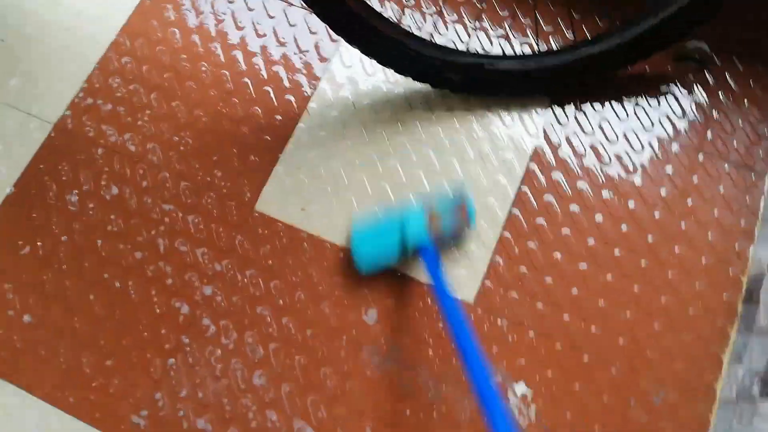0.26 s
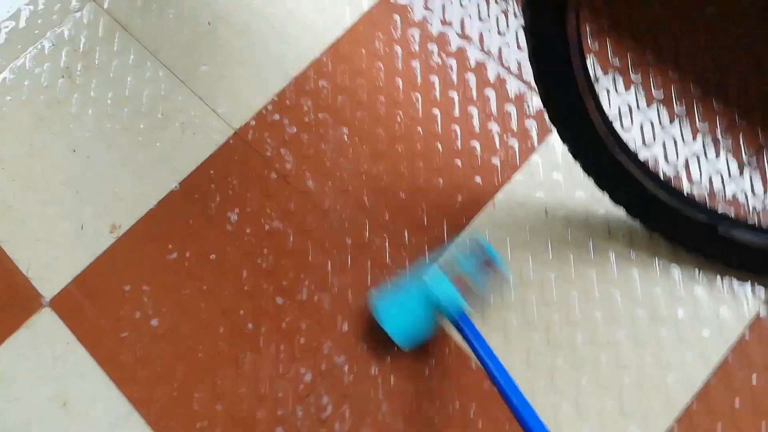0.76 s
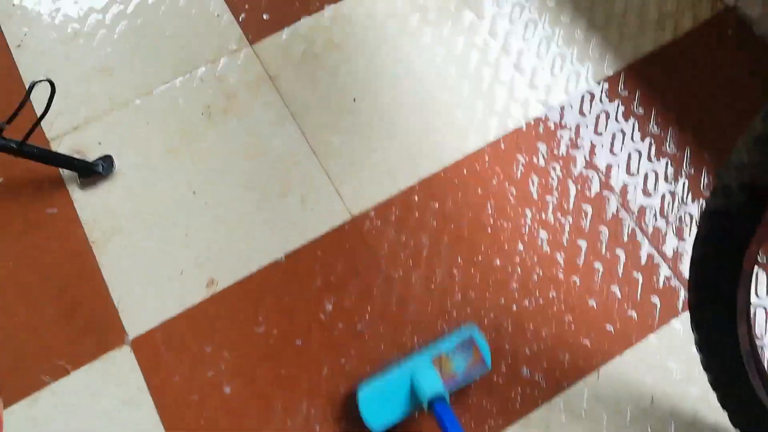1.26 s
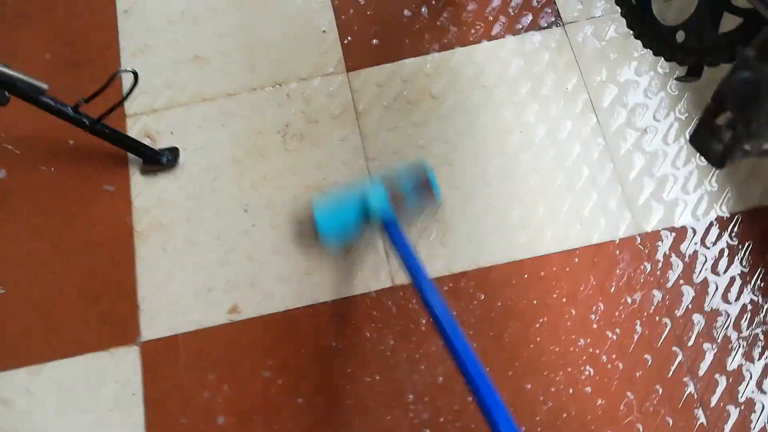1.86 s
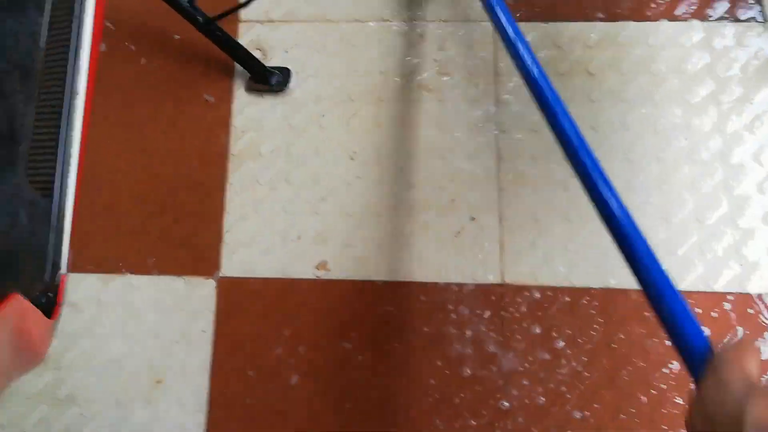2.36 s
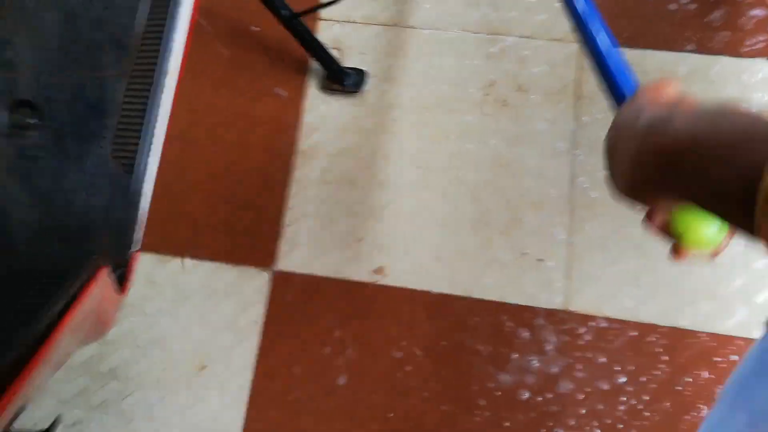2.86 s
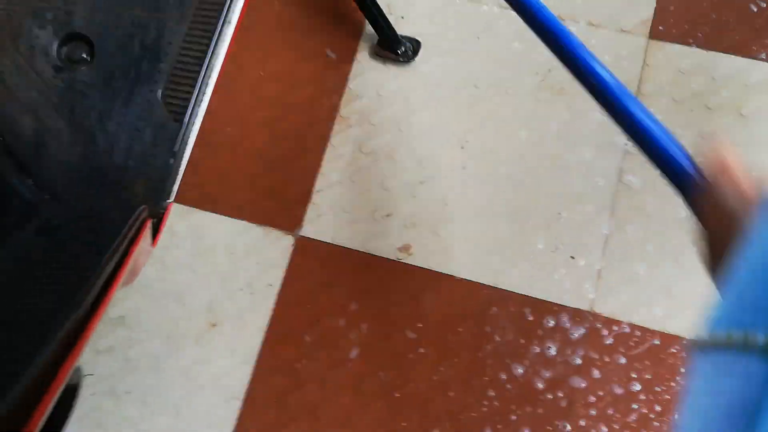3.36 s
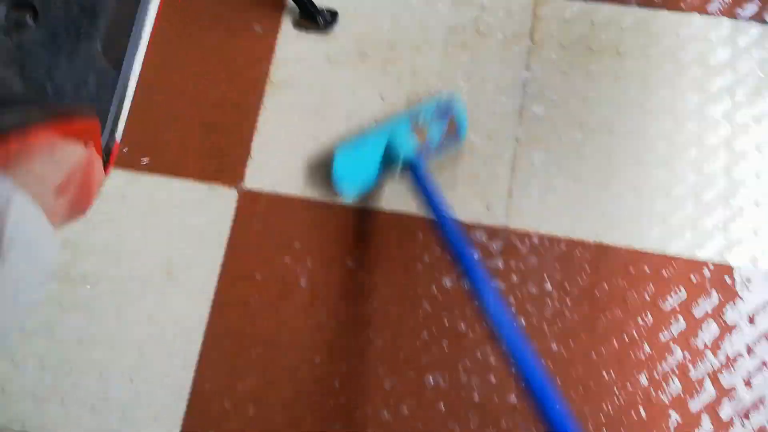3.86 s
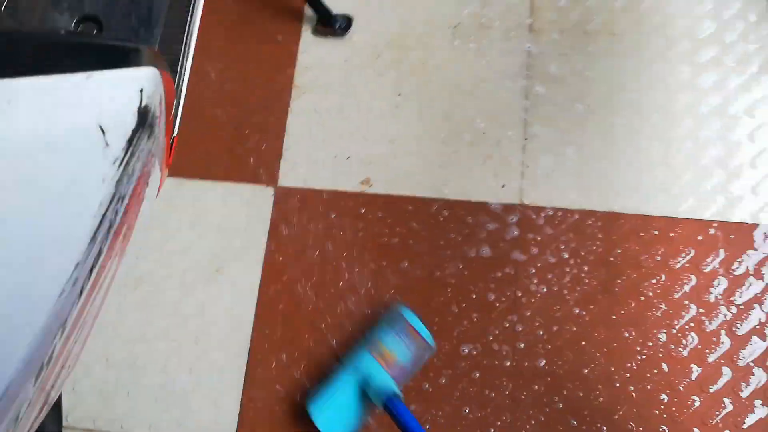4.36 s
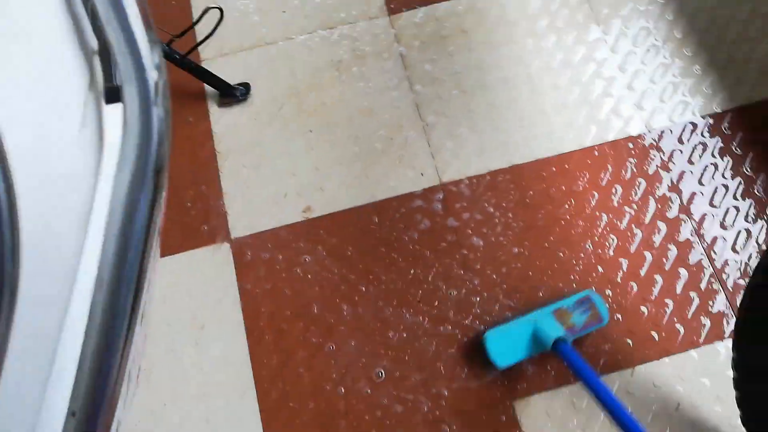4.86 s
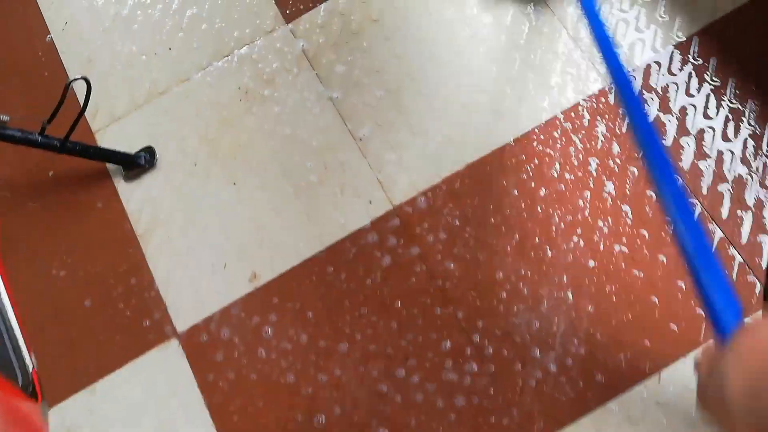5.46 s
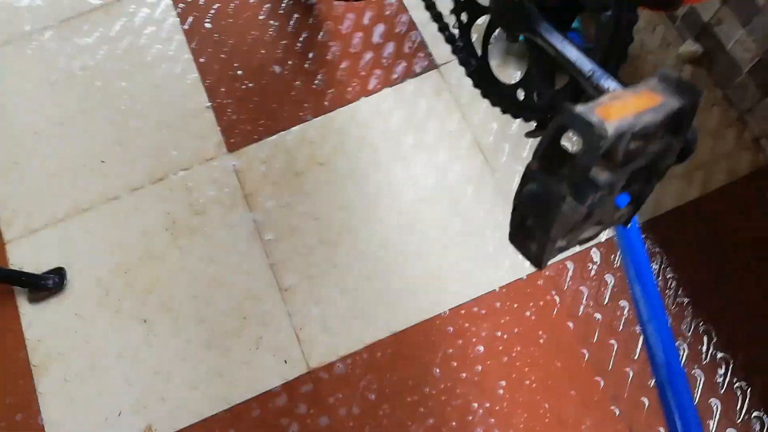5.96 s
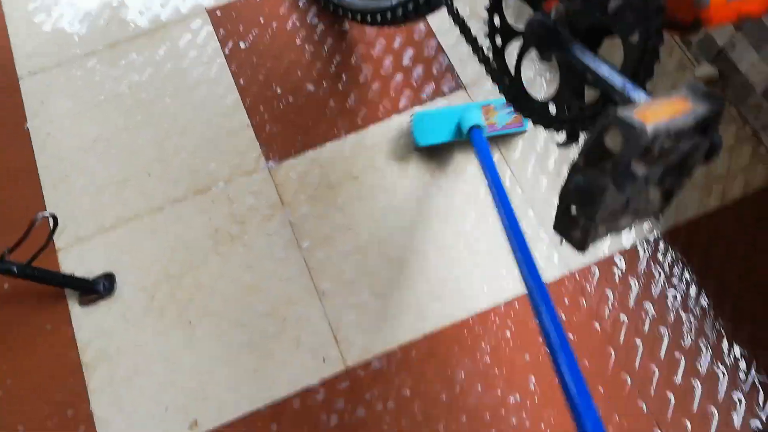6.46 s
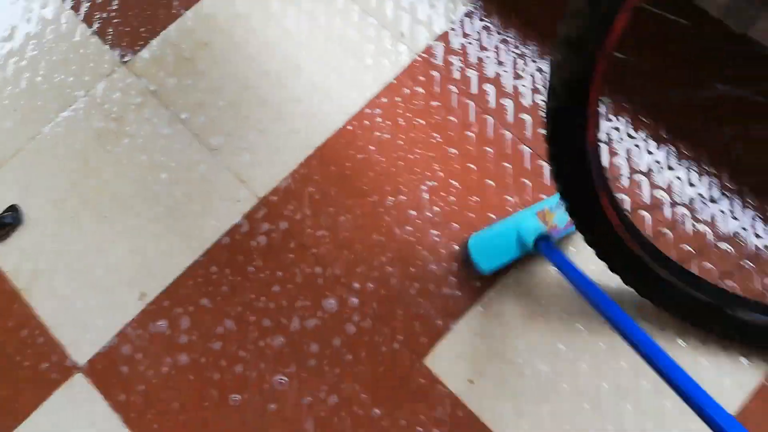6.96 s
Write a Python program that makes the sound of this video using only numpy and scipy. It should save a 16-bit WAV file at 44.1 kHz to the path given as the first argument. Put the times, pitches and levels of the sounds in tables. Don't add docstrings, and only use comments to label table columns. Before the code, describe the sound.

Outdoors in a hard-walled yard, a stiff brush scrubs wet studded tile close to a hand-held stereo microphone. From 0 s, quick alternating pulls and pushes come about four to five per second, nearly without gaps: bright fizz of bristle tips in suds, mid-high scrape, coarser rasp, and a stuttering hollow plastic knock as tufts catch studs. Harder knocks stand out near 0.1, 1.4, 2.3, 2.75 and 3.2 s. Beneath lie low rumble and a faint far motor, swelling near 0.1, 2.9 and 5.2 s. A tiny high bird whistle glides at 0.2-0.3 s. Soft air thumps hit the microphone around 1.3, 1.65, 2.15, 3.0, 3.3 and 5.05 s, with brief gusts at 3.0 and 3.3 s. Strokes ease slightly after 5.5 s. At 6.95 s the head bounces rapidly on a bicycle wheel, a short dry metallic clack, checking the stroke; a last lighter rasp fades after 7.1 s.

```python
import sys
import numpy as np
from scipy import signal
from scipy.fft import rfft, irfft, next_fast_len
from scipy.io import wavfile
from scipy.ndimage import uniform_filter1d

SR = 44100
rng = np.random.default_rng(int(sys.argv[2]) if len(sys.argv) > 2 else 0)


def log_audio(samples):
    frames = np.atleast_2d(samples).T
    limited = np.clip(frames, -1, 1)
    pcm = np.round(limited * 32767).astype(np.int16)
    wavfile.write(sys.argv[1], SR, pcm)


def makeup_ratio(level_db):
    decades = np.asarray(level_db, float) / 20
    return 10 ** decades


N = 317520


def evened(x):
    return x / np.sqrt(np.mean(x ** 2) + 1e-20)


def read(points, hz):
    f, value = np.transpose(points)
    return np.interp(np.log(hz + 1), np.log(f + 1), value)


def curve(rows, column=1):
    rows = np.asarray(rows)
    return np.interp(np.arange(N) / SR, rows[:, 0], rows[:, column])


def colour(x, points, share=1):
    size = next_fast_len(N)
    gain = makeup_ratio(share * read(points, np.fft.rfftfreq(size, 1 / SR)))
    return irfft(rfft(x, size) * gain, size)[..., :N]


def above(x, hz):
    return signal.sosfilt(signal.butter(3, hz, "high", fs=SR, output="sos"), x)


def band_noise(order, low_hz, high_hz, shape):
    sos = signal.butter(order, [low_hz, high_hz], "band", fs=SR, output="sos")
    return evened(signal.sosfilt(sos, rng.standard_normal(shape)))


def clicks(per_s, spread_db):
    size = makeup_ratio(spread_db * np.minimum(rng.exponential(1, (2, N)), 4))
    happens = rng.random((2, N)) < per_s / SR
    return size * rng.choice([-1., 1.], (2, N)) * happens


def flutter(ms, db):
    width = int(ms * SR / 1000)
    wander = uniform_filter1d(uniform_filter1d(rng.standard_normal(N), width), width)
    return makeup_ratio(db * evened(wander))


def pair(two, same, lag=0):
    same = np.clip(same, 0, 1)
    left = np.roll(two[0], lag)
    right = same * two[0] + np.sqrt(1 - same ** 2) * two[1]
    return np.array([left, right])


# (time [s], half length [s], level [dB])
ENGINE_SWELLS = [(0.146, 0.26, 9.5), (2.9, .25, 7), (4.25, 0.15, 7), (5.2, .25, 12), (5.9, .35, 8)]


def revs():
    t = np.arange(N) / SR
    return sum(db * np.exp(-((t - s) / half) ** 2) for s, half, db in ENGINE_SWELLS)


# (frequency [Hz], level [dB per Hz])
YARD_RUMBLE = [(12, -34), (20, -4), (54, -3), (103, -3.5), (166, -12), (346, -14.5), (464, -22), (752, -19),
               (927, -24), (1100, -21), (1810, -19), (2380, -26), (3000, -24), (3900, -46), (6600, -120)]
# (frequency [Hz], left-right likeness [-1 to 1])
YARD_LIKENESS = [(60, 0.94), (130, 0.91), (290, 0.64), (640, -0.67), (1410, 0.65), (3100, -0.38),
                 (6820, 0.03), (15000, 0.02)]
# (time [s], load [dB])
ENGINE_LOAD = [(0, 11.5), (.3, 3), (.7, 5), (1.1, -3), (1.5, 4), (2.2, -2.5), (2.9, 11), (3.55, -6.5),
               (4.05, -4), (4.4, 4.5), (5, -1), (6, -2.5), (6.7, -3), (7.2, 5)]


def yard():
    frames, hz = N // 512 + 5, np.fft.rfftfreq(2048, 1 / SR)
    a, b, c, d, patches = rng.standard_normal((frames, 1025, 5)).T
    patches = uniform_filter1d(patches, size=5, axis=0)
    patches = evened(uniform_filter1d(patches, size=6, axis=1))
    same = np.clip(read(YARD_LIKENESS, hz) + 0.041, -1, 1)[:, None]
    left = a + 1j * b
    right = same * left + np.sqrt(1 - same ** 2) * (c + 1j * d)
    z = np.array([left, right]) * makeup_ratio(read(YARD_RUMBLE, hz)[:, None] + 2.2 * patches)
    rumble = signal.istft(z, nperseg=2048, noverlap=1536)[1][:, :N]
    level_db = -52 + 0.16 * curve(ENGINE_LOAD) + 0.25 * revs()
    return makeup_ratio(level_db) * evened(rumble)


# (frequency [Hz], width [Hz])
ENGINE_ORDERS = [(106, 7.9), (375, 130)]


def motor():
    out, t = np.zeros(N), np.arange(N) / SR
    load_db, swell_db = curve(ENGINE_LOAD), revs()
    order_db, load_share = [-60, -72.5], [1.03, .1]
    for k, (hz, width) in enumerate(ENGINE_ORDERS):
        r = np.exp(-np.pi * width / SR)
        noise = rng.standard_normal(N) + 1j * rng.standard_normal(N)
        slow = signal.lfilter([1], [1, -r], noise)
        order = evened((slow * np.exp(2j * np.pi * hz * t)).real)
        out += order * makeup_ratio(order_db[k] + load_share[k] * load_db + k * swell_db)
    return out


def release_db(place):
    let_go = .78
    lost_db = np.array([-.5, -5, -7, -11])
    return lost_db[:, None] * np.clip((place - let_go) / .05, 0, 1)


def strokes(rows, layers, arch):
    t, out = np.arange(N) / SR, np.zeros((len(layers), N))
    db, lean_db, rising, falling, share = np.transpose(layers)[:, :, None]
    for s, rise, fall, strength_db, grip_db in rows:
        at = slice(max(int((s - rise) * SR), 0), int((s + fall) * SR))
        early = t[at] < s
        place = np.clip((t[at] - s) / np.where(early, rise, fall), -1, 1)
        speed = 1 - abs(place) ** np.where(early, *arch)
        level_db = strength_db + db + lean_db * place + release_db(place) + share * grip_db
        out[:, at] += (makeup_ratio(level_db) * speed ** np.where(early, rising, falling)) ** 2
    return out


def studs(speed_db):
    per_s = np.clip(62 * makeup_ratio(.4 * speed_db), 32, 110) * flutter(9, 2.0)
    rows = np.diff(np.floor(np.cumsum(per_s) / SR), prepend=0)
    rows = rows * makeup_ratio(2.5 * rng.standard_normal(N))
    t = np.arange(900) / SR
    burst = np.exp(-t / 0.0056) - np.exp(-t / 0.001)
    return evened(0.23 + signal.oaconvolve(rows, burst)[:N])


def ringing(modes):
    t = np.arange(1500) / SR
    ring = sum(makeup_ratio(db) * np.sqrt(w) * np.exp(-np.pi * w * t) * np.sin(2 * np.pi * hz * t)
               for hz, w, db in modes)
    return above(ring * (1 - np.exp(-t / 0.00018)), 680)


# (fastest moment [s], speeding up [s], slowing down [s], strength [dB], grip on the studs [dB])
PULL_STROKES = [(0.078, 0.14, 0.16, -23.5, 0.6), (0.54, 0.18, 0.15, -23.5, -0.4),
                (0.938, 0.073, 0.23, -22.5, -0.7), (1.432, 0.1, 0.18, -24, 2),
                (1.906, 0.09, 0.17, -23, 1.5), (2.324, 0.077, 0.18, -22, -0.9),
                (2.755, 0.092, 0.21, -22.5, 0), (3.192, 0.075, 0.16, -24.5, 1.3),
                (3.699, 0.098, 0.098, -26.5, 2.8), (4.107, 0.14, 0.12, -24.5, 1.8),
                (4.557, 0.1, 0.127, -23.5, 0.5), (5.018, 0.16, 0.11, -25, -2.5),
                (5.421, 0.14, 0.18, -23.5, -1.9), (5.882, 0.095, 0.17, -25.5, -0.7),
                (6.37, 0.11, 0.13, -26.5, 3.5), (6.865, 0.086, 0.1, -26, -10.3)]
PUSH_STROKES = [(0.384, 0.167, 0.099, -25, 1), (0.804, 0.12, 0.094, -25, -2),
                (1.258, 0.208, 0.086, -25.0, -1), (1.738, 0.16, 0.122, -23.5, -10),
                (2.186, 0.134, 0.092, -23, 0.5), (2.59, 0.12, 0.11, -23, -6), (3.058, 0.15, 0.1, -25.5, -4),
                (3.486, 0.13, 0.17, -22.0, 7), (3.937, 0.196, 0.12, -22.5, 6.5),
                (4.364, 0.14, 0.14, -22.5, -1), (4.83, 0.153, 0.17, -24.5, 7), (5.251, 0.12, 0.09, -25, -9),
                (5.719, 0.14, 0.098, -26.3, -20), (6.204, 0.16, 0.091, -25, -7),
                (6.698, 0.23, 0.17, -23, 1.5), (7.093, 0.14, 0.26, -27, 12.5)]
SHORT_DRAGS = [(3.325, .05, 0.026, -40, 19), (2.9, .05, .045, -45, 12), (1.12, .05, .045, -42, 10),
               (5.54, 0.045, 0.033, -43.5, 13), (1.56, .04, .04, -46, 10), (4.88, .03, .06, -40, 12.5),
               (3.57, .03, .03, -42, 7.5),
               (7.11, .08, .16, -40, 9), (6.0, .03, .04, -46, 3)]
# (level [dB], gain along the stroke [dB],
# power of speed rising [exponent], power falling [exponent], share of grip [ratio])
LAYERS_PULLED = [(0, 2.5, 2.75, 1.55, 0.0038), (-11.5, 2, 1.7, 1.24, 0.38), (-13, -1.5, 2.1, 0.92, 0.72),
                 (-15.5, -1.2, 2.54, 0.63, 0.88)]
LAYERS_PUSHED = [(0, 1.2, 1.66, 2.6, 0), (-12, 6.3, 1.2, 2.16, 0.13), (-19.5, 15, 0.36, 3.3, 0.27),
                 (-35, 13, 0.47, 3.8, 1)]
ARCH_PULLED = (2.9, 1.12)
ARCH_PUSHED = (1.72, 1.99)
CREEP = [-50, -58.5, -63, -64.5]
# (time [s], left-right [dB])
SWING_ACROSS = [(0, -4.5), (.75, -7.5), (1.15, -2), (1.9, -4.5), (3.0, -2.5), (3.75, -1.5), (4.8, -6),
                (6.7, -5), (7.2, -8.5)]
# (frequency [Hz], level [dB per Hz])
FIZZ_COLOUR = [(4500, -33), (6200, -8.5), (7500, -1.5), (9000, 1), (11000, 0), (13000, -5), (15000, -10),
               (15800, -22), (16100, -65)]
# (frequency [Hz], level [dB per Hz])
SCRAPE_COLOUR = [(2800, -35.5), (3700, -6), (4300, 2.5), (5500, 0.5), (6500, -6), (8500, -39)]
# (frequency [Hz], level [dB per Hz])
RASP_COLOUR = [(1300, -29), (2200, -4.5), (2800, -1.5), (3300, 1), (4000, -1.5), (5200, -67)]
# (frequency [Hz], width [Hz], level [dB])
HEAD_MODES = [(825, 110, -3), (1400, 180, 2), (1316, 460, -3.5), (1790, 315, 15), (2330, 670, -5)]
# (from [s], to [s])
BRUSH_DIP = (6.937, 6.966)


def brush():
    pan_db, t = curve(SWING_ACROSS), np.arange(N) / SR
    pulling = strokes(PULL_STROKES + SHORT_DRAGS, LAYERS_PULLED, ARCH_PULLED)
    pushing = strokes(PUSH_STROKES, LAYERS_PUSHED, ARCH_PUSHED)
    power = pulling + pushing + makeup_ratio(CREEP)[:, None] ** 2
    speed_db = 10 * np.log10(power[0]) + 27
    slowing_db = np.roll(speed_db, 1800) - speed_db
    bumps = studs(speed_db)

    fizz = colour(pair(clicks(14000, 2.5), 0.018), FIZZ_COLOUR)
    fizz = evened(fizz * bumps ** 0.091 * flutter(13.0, 1.0))
    scrape = colour(pair(clicks(9000, 2.1), 0.089, lag=7), SCRAPE_COLOUR)
    scrape = evened(scrape * bumps ** 0.37)
    rasp = colour(pair(clicks(6000, 3.8), 0.026, lag=7), RASP_COLOUR)
    rasp = evened(rasp * bumps ** 0.39)

    catches = pair(clicks(3000, 1.65), 0.77, lag=3) * bumps ** 0.91
    low = signal.oaconvolve(catches, ringing(HEAD_MODES[:2])[None])[:, :N]
    high = signal.oaconvolve(catches, ringing(HEAD_MODES[2:])[None])[:, :N]
    loose_db = -6 * (1 - pulling[3] / power[3])
    low_db = np.clip(1.8 * slowing_db, -6, 4) + loose_db
    head = evened(high + low * makeup_ratio(low_db)) * makeup_ratio(-0.66)

    layers = sum(x * np.sqrt(p) for p, x in zip(power, [fizz, scrape, rasp, head]))
    halt_db = uniform_filter1d(-12.0 * (t > BRUSH_DIP[0]) * (t < BRUSH_DIP[1]), size=200)
    side_db = 0.52 * (pan_db - pan_db.mean()) * np.array([[.5], [-.5]])
    return layers * makeup_ratio(halt_db + side_db)


def patchy(x, db):
    z = signal.stft(x, nperseg=512, noverlap=384)[2]
    field = rng.standard_normal(z.shape[::-1]).T
    field = uniform_filter1d(uniform_filter1d(field, size=6, axis=1), size=14, axis=2)
    return signal.istft(z * makeup_ratio(db * evened(field)), nperseg=512, noverlap=384)[1][:, :N]


# (time [s], peak level [dB], added pitch [Hz])
HARD_CATCHES = [(0.017, -21, 1780), (0.082, -30, 1780), (0.11, -26, 2040), (0.112, -14.5, 1740),
                (0.134, -21, 1800), (0.512, -35, 1680), (1.366, -26, 1960), (1.371, -22, 1860),
                (1.425, -18, 1780), (1.477, -21, 1860), (1.857, -30, 1866), (1.909, -40, 1910),
                (2.276, -22, 1843), (2.313, -18, 1840), (2.357, -32, 1800), (2.408, -19.5, 1240),
                (2.69, -39, 1748), (2.701, -29, 1754), (2.758, -16, 1710), (3.156, -23, 1800),
                (3.188, -16, 1370), (3.561, -30, 1693), (3.654, -23, 1800), (4.044, -27.5, 1890),
                (4.068, -31, 1820), (4.09, -27, 1710), (5.816, -37, 1905), (5.917, -23, 1824),
                (6.307, -33, 1660), (6.38, -25, 1820)]


def knocks():
    out = np.zeros((2, N))
    for s, db, hz in HARD_CATCHES:
        ring = ringing(HEAD_MODES + [(hz, 260, 3.0)])
        out[:, round(s * SR):][:, :len(ring)] += makeup_ratio(db - 5.0) * ring / abs(ring).max()
    return out


def porch(x):
    out, turn = np.zeros((2, N)), np.arange(N) / SR * 2.245
    for k in range(3):
        taps = np.zeros((2, 8000))
        at = np.arange(200, 7980, 20) + rng.integers(0, 20, (2, 389))
        np.put_along_axis(taps, at, rng.choice([-1., 1.], at.shape), 1)
        taps *= makeup_ratio(-60 * np.arange(8000) / SR / 0.094)
        taps /= np.linalg.norm(taps[0])
        out += signal.oaconvolve(x * np.cos(np.pi * (turn + k / 3)), taps, axes=1)[:, :N]
    return out


# (time [s], pitch [Hz], level [dB])
WHISTLE = [(.12, 4530, -70), (.17, 4570, -63), (.21, 4730, -53), (.3, 4720, -50), (.34, 4700, -70)]


def bird():
    hz = curve(WHISTLE)
    tone = np.sin(2 * np.pi * np.cumsum(hz) / SR)
    sounding = hz != WHISTLE[-1][1]
    return makeup_ratio(curve(WHISTLE, column=2)) * sounding * tone * makeup_ratio([[-4], [1.5]])


# (time [s], peak level [dB], pace [Hz], depth of the dip [ratio], sign and size [ratio])
AIR_PUFFS = [(1.308, -35.5, 60, 0.76, 0.79), (1.342, -28.5, 108, 0.99, 1), (1.361, -29, 130, 0.58, 0.94),
             (1.606, -33, 70, 1, 1), (1.634, -30, 55, 1.5, 0.91), (1.655, -22.5, 169, 1.8, 0.96),
             (1.66, -24, 169, 0.23, 0.97), (1.666, -16, 133, 0.93, 1), (1.688, -24.5, 120, 0.83, -1.1),
             (2.154, -24.5, 112, 0.23, 1), (2.163, -37, 129.6, 1.39, 0.9), (2.974, -45, 60, .6, 0.88),
             (2.997, -33, 60, .8, 0.81), (3.01, -30, 130, .5, 0.97), (3.023, -24.5, 112, 1.2, 0.83),
             (3.028, -30, 120, 0.11, -1), (3.040, -35, 89, 1.8, 1), (3.051, -30, 70.2, .1, 0.93),
             (3.302, -17.5, 165, 0.15, 1), (3.308, -28, 135.3, 1.86, 0.98), (3.311, -26, 130, 0.067, -1.1),
             (3.334, -31.5, 24.93, 0.33, 0.88), (3.344, -34, 70, 0.23, -1), (5.053, -31, 90, 1, 0.57)]


def puffs():
    out = np.zeros((2, N))
    churn = band_noise(4, 180, 480, N)
    churn = np.array([np.roll(churn, 48), churn])
    for s, db, hz, dip, sign in AIR_PUFFS:
        at = slice(int((s - .06) * SR), int((s + .06) * SR))
        u = (np.arange(N)[at] / SR - s + np.array([[0], [.0011]])) * hz * 7.4
        shape = np.exp(-u ** 2) - dip * np.exp(-(u + 3.72) ** 2)
        shape += 0.056 * churn[:, at] * np.exp(-(u / 14.0) ** 2)
        out[:, at] += sign * makeup_ratio(db + np.array([[-.7], [.7]])) * shape
    return out


# (time [s], half length [s], level [dB])
AIR_RUSHES = [(3.022, .022, -58), (3.328, .018, -47)]


def rushes():
    t = np.arange(N) / SR
    air = band_noise(2, 250, 900, (2, N)) * makeup_ratio([[-3], [1.6]])
    return air * sum(makeup_ratio(db) * np.exp(-((t - s) / half) ** 4) for s, half, db in AIR_RUSHES)


# (time [s], level [dB])
WHEEL_TAPS = [
    (6.9468, -27),
    (6.9476, -24),
    (6.9494, -26),
    (6.9516, -29),
    (6.953, -32),
]
# (frequency [Hz], level [dB], 60 dB decay [s])
RIM_MODES = [(878, 0, .016), (1297, -22, 0.0081), (2040, 0.5, 0.018), (3150, 2.5, 0.016), (3970, -3, 0.014),
             (5370, 1, 0.0095), (6800, -6, 0.0049), (8860, 1, .006)]


def wheel():
    t, blows = np.arange(3000) / SR, np.zeros(N)
    ring = sum(makeup_ratio(db - 60 * t / t60) * np.sin(2 * np.pi * hz * t) for hz, db, t60 in RIM_MODES)
    ring = above(ring * np.minimum(t / 0.00014, 1), 770)
    for s, db in WHEEL_TAPS:
        blows[round(s * SR)] = makeup_ratio(db - 5.5)
    return signal.oaconvolve(blows, ring)[:N] * makeup_ratio([[-1.1], [1.1]])


def scene():
    near = patchy(brush(), 2.1) + knocks() + wheel()
    far = yard() + motor() + bird()
    return near + makeup_ratio(-17) * porch(near) + far + puffs() + rushes()


def roll_off(x):
    return signal.sosfilt(signal.butter(12, 16520, fs=SR, output="sos"), x)


# (frequency [Hz], left-right [dB])
PORT_COLOUR = [(200, 0.5), (400, -0.5), (700, -4.5), (1300, -0.5), (2400, -1), (4400, -0.5), (6500, 1.5),
               (9000, 0), (12000, -10.5), (15000, -6)]


def record(dry):
    left = colour(dry[0], PORT_COLOUR, 1.0)
    right = colour(dry[1], PORT_COLOUR, -0.33)
    return roll_off(np.array([left, right]))


dry = scene()
out = record(dry)
log_audio(out)
```